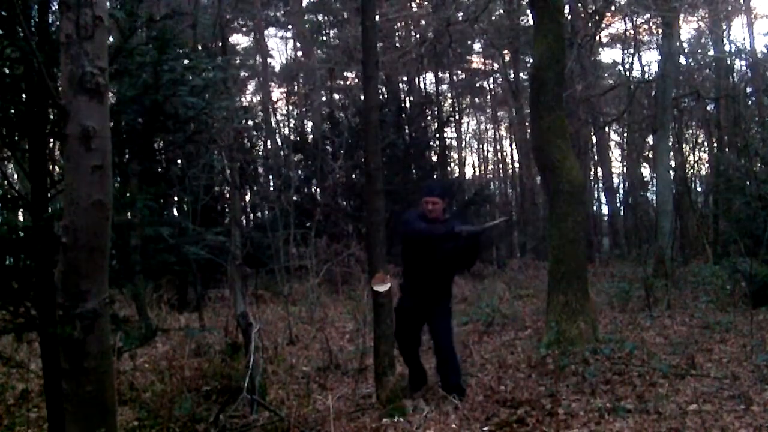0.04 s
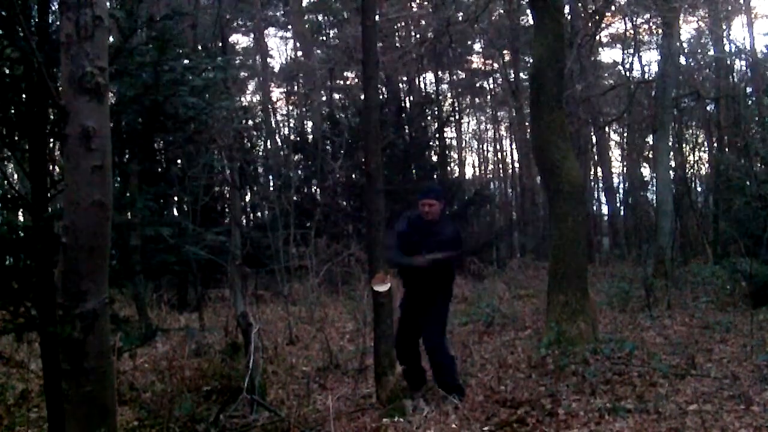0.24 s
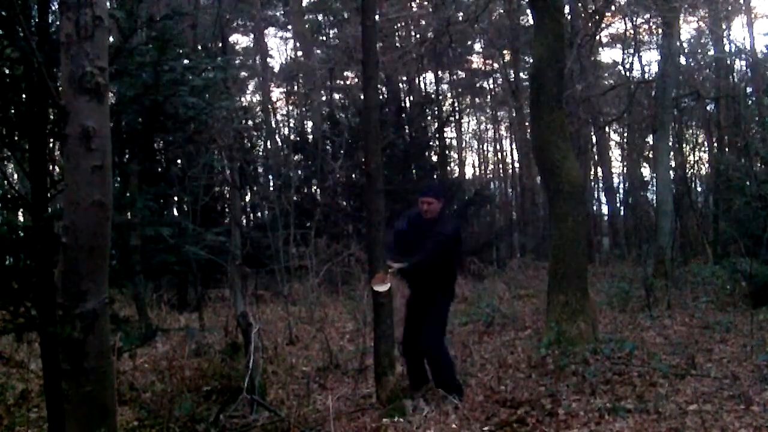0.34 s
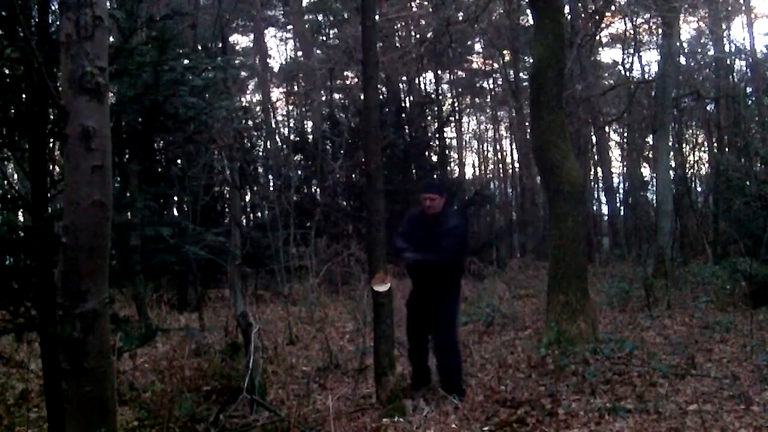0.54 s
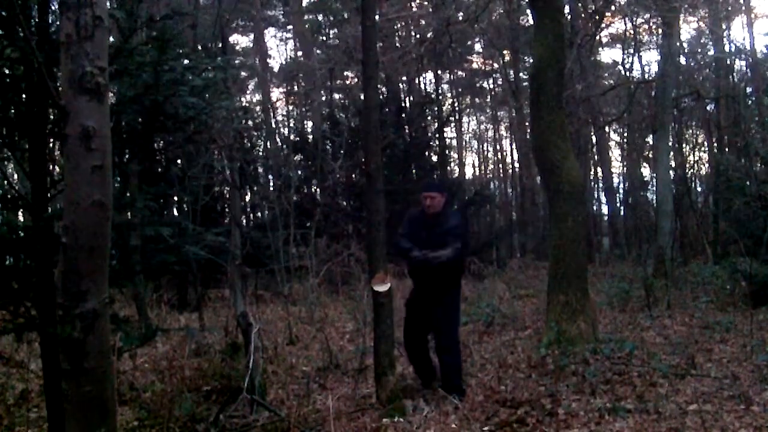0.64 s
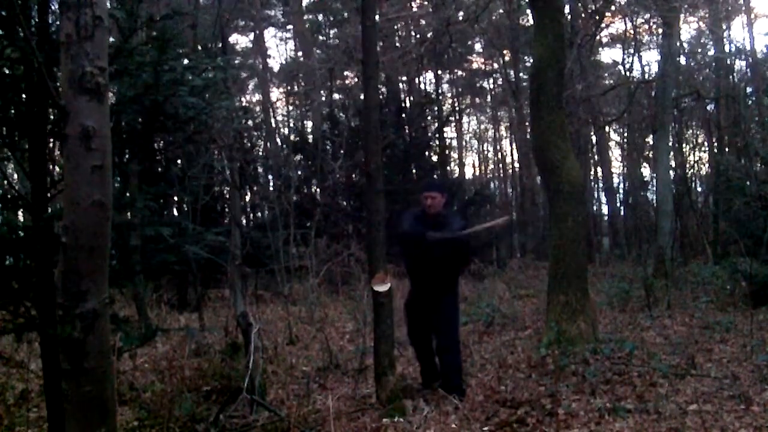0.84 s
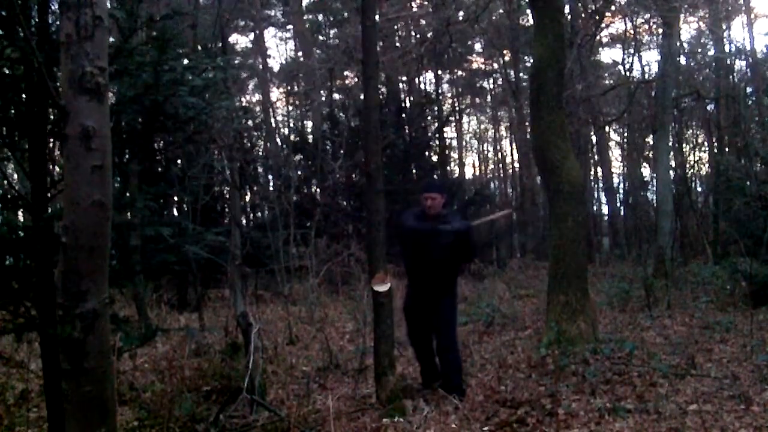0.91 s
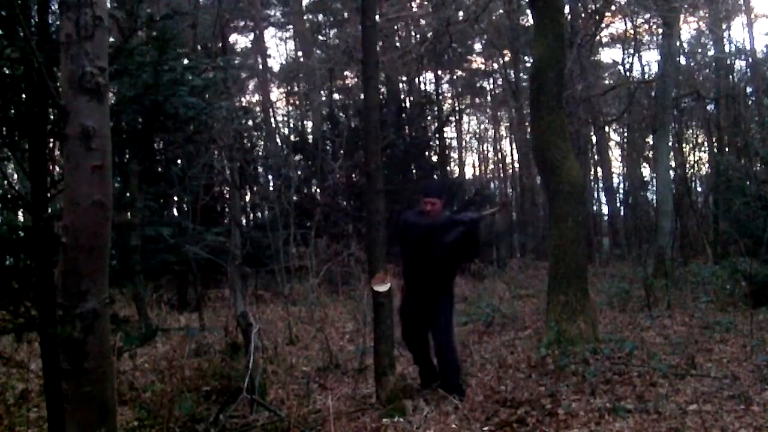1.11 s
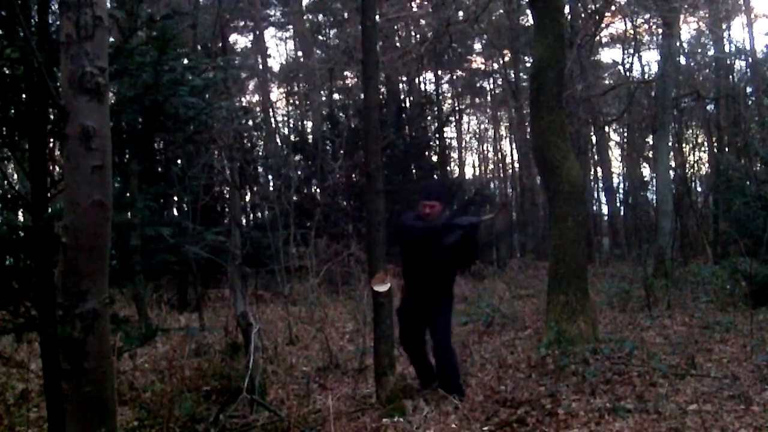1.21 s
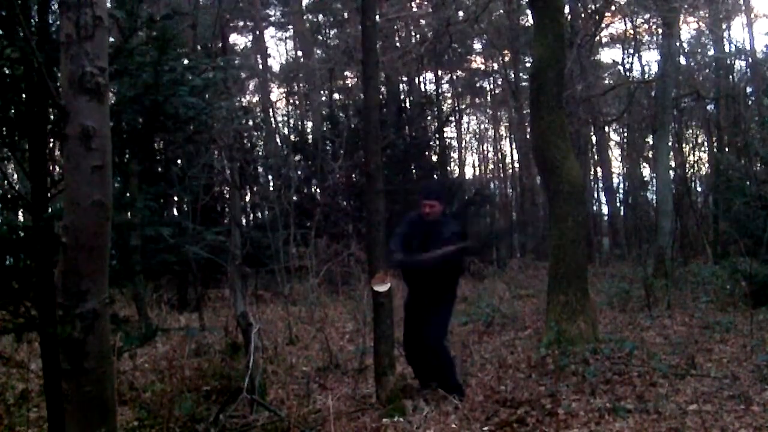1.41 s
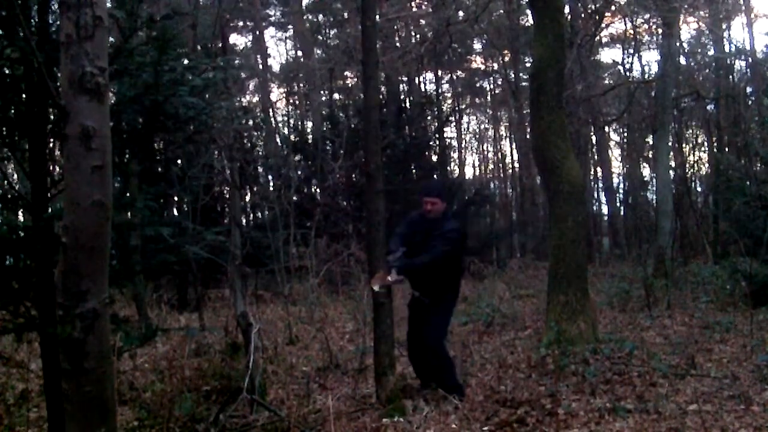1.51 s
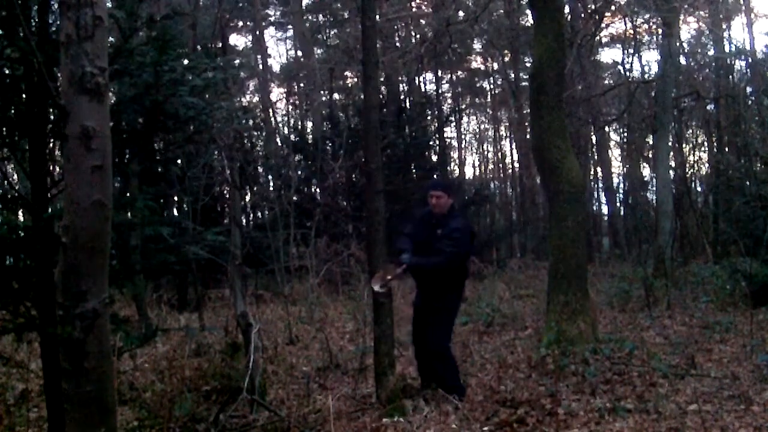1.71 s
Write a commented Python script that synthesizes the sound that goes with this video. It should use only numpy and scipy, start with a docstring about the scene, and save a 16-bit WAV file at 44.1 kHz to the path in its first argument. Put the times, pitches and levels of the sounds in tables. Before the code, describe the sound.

Two sharp axe blows crack into a hollow dead trunk, echoing through a quiet forest

```python
"""Axe on a dead trunk

Two axe blows on a dead standing trunk, some metres away in a quiet forest.
Each blow is a run of impulses that excites decaying modes: crack, knock, hollow ring and stem thud.
Grain noise tears the fibres, and noise decaying band by band is the scatter from the trees.
Around the blows filtered noise makes ticking chips, twigs and dry leaves over a low rumble of air."""
import sys
import numpy as np
from scipy import signal
from scipy.fft import rfft, irfft
from scipy.io import wavfile

SR = 44100
rng = np.random.default_rng(int(sys.argv[2]) if len(sys.argv) > 2 else 0)


def waveform_to_disk(signal):
    """Save audio, clipped to [-1, 1], as 16-bit WAV at the path in sys.argv[1]."""
    frames = np.transpose(np.atleast_2d(signal))
    scaled = np.clip(frames, -1, 1) * 32767
    samples = np.round(scaled).astype(np.int16)
    wavfile.write(sys.argv[1], SR, samples)


N = 77175   # samples
TIME = np.arange(N) / SR   # s

# jolts of the blade in the wood: start_s, crack_db, knock_db, hollow_db, thud_db, knock_upper_edge_hz
JOLTS = [(.2366, -1.5, -26, -22, -24, 1970), (.2430, -26.5, -15.5, -11, -20, 1610),
         (0.2499, -19.5, -32.5, -26.5, -12, 1590), (.2802, -29, -21, -38, -40, 1500),
         (1.4144, -17.5, -52, -23, -51, 1290), (1.4174, -24.5, -39, -56, -33, 1190),
         (1.4224, -17, -19.5, -42, -22.5, 1020), (1.4271, -34, -35, -38, -13, 960),
         (1.4361, -45, -24, -40, -10.5, 1180)]
# colour of dry litter, both snapping and rustling: frequency_hz, level_db
LITTER_COLOUR = [(800, -26.5), (1500, 9.5), (2500, 6), (4000, 2), (7000, -3), (10000, -6.5), (15000, -13)]


def from_db(db):
    """Amplitude ratio: 20 dB is a factor of ten in gain."""
    return 10 ** (np.asarray(db) / 20)


def rms_one(x):
    """Normalisation by mean power: scale to rms 1."""
    return x / np.sqrt(np.mean(x ** 2) + 1e-20)


def at_hz(points, hz, axis=1):
    """Logarithmic pitch scale: read a table's column, interpolated over log frequency."""
    table = np.array(points)
    return np.interp(np.log(hz + 1e-9), np.log(table[:, 0]), table[:, axis])


def coloured(x, spectrum):
    """Linear filtering: weight each frequency of a steady signal; rms 1."""
    bin_hz = np.arange(N // 2 + 1) * SR / N
    gains = from_db(at_hz(spectrum, bin_hz))
    return rms_one(irfft(rfft(x) * gains, N))


def noise(spectrum):
    """Stationary random process: Gaussian noise of a given colour, rms 1."""
    return coloured(rng.standard_normal(N), spectrum)


def grains(per_s, spread_db):
    """Shot noise: random one-sample clicks of uneven size and random sign."""
    excess_db = spread_db * np.minimum(rng.exponential(1, N), 4)
    sizes = from_db(excess_db) * rng.choice([-1, 1], N)
    return sizes * (rng.random(N) < per_s / SR)


def dying(s, t60):
    """Exponential decay: jump to 1 at s, then fall 60 dB in each t60."""
    return (TIME >= s) * np.exp(-np.log(1000) * np.clip((TIME - s) / t60, 0, 10))


def click(s):
    """Unit impulse, shared between the two samples around s."""
    return np.maximum(0, 1 - np.abs(TIME - s) * SR)


def ring(force, modes, alternate=False):
    """Modal superposition: modes of like sign start at once, those of alternating sign swell."""
    out = np.zeros(N)
    for k, (hz, db, t60) in enumerate(modes):
        radius = np.exp(-np.log(1000) / (t60 * SR))   # decay per sample
        angle = 2 * np.pi * hz / SR
        feedback = [1, -2 * radius * np.cos(angle), radius * radius]
        mode = from_db(db) * signal.lfilter([.5, 0, -.5], feedback, force + 1e-18)
        out += -mode if alternate and k % 2 else mode
    return out


def soften(x, hz, order=2):
    """Contact compliance: a soft contact low-passes the force."""
    return signal.sosfilt(signal.butter(order, hz, fs=SR, output="sos"), x + 1e-18)


def air():
    """Broadband ambience: steady noise with most of its power in the bass."""
    # colour of the air: frequency_hz, level_db
    air_colour = [(15, -17.5), (28, -3), (45, -1.5), (65, -4), (95, -13.5), (160, -16), (280, -21),
                  (600, -23), (900, -26), (1450, -26.5), (1750, -39), (3000, -42.5), (5000, -51.5),
                  (8000, -58), (14500, -61), (15800, -55)]
    level_db = -43
    return from_db(level_db) * noise(air_colour)


def leaves():
    """Granular friction: the pressure underfoot sets the level of a dense shower of leaf clicks."""
    # shifts of the leaves, Gaussian in time: centre_s, level_db, standard_deviation_s
    shuffles = [(.205, -66, .012), (0.557, -59, 0.016), (0.611, -59.5, .03), (0.707, -64, 0.051),
                (1.01, -59.5, 0.014), (1.111, -57.5, 0.039), (1.17, -67, 0.023), (1.217, -62.5, 0.027),
                (1.382, -65.5, 0.032), (1.608, -62, 0.031), (1.728, -58, 0.028)]
    pressure = sum(from_db(db) * np.exp(-((TIME - s) / width) ** 2 / 2) for s, db, width in shuffles)
    return pressure * coloured(grains(per_s=3600, spread_db=3.5), LITTER_COLOUR)


def snaps():
    """Resonant fracture: each chip or twig is a dying noise burst, partly filtered by a resonance."""
    # snaps in the litter: start_s, level_db, t60_s, pitch_hz
    snap_events = [(.2858, -34, 0.022, 9300), (0.3506, -37, 0.012, 7900), (.3825, -45.5, 0.018, 7300),
                   (1.084, -37.5, 0.01, 5500), (1.089, -47, 0.095, 2170), (1.145, -39.5, 0.031, 2360),
                   (1.2221, -52, 0.044, 9000), (1.272, -56, .02, 4020), (1.3627, -54.5, 0.036, 6550),
                   (1.537, -46, .012, 6460), (1.676, -48, 0.034, 6000)]
    ring_share = 0.56   # amplitude share of the resonant part
    crunch, out = noise(LITTER_COLOUR), np.zeros(N)
    for s, db, t60, hz in snap_events:
        ringing = rms_one(signal.lfilter(*signal.iirpeak(hz, 2, fs=SR), crunch))
        out += from_db(db) * dying(s, t60) * (ring_share * ringing + (1 - ring_share) * crunch)
    return out


def taps():
    """Damped impact: light wooden taps as coloured noise with exponential decay."""
    # taps between the blows: start_s, level_db, t60_s
    tap_events = [(0.9232, -36.5, 0.1), (1.3091, -32.5, 0.031)]
    # colour of the taps: frequency_hz, level_db
    tap_colour = [(300, -23), (550, 1), (800, 2.5), (1050, 13), (1450, -8), (1800, -16), (3500, -16.5),
                  (7000, -27.5), (15000, -41)]
    return noise(tap_colour) * sum(from_db(db) * dying(s, t60) for s, db, t60 in tap_events)


def forest(near_rise_s, far_rise_s, count=26):
    """Multiple scattering: near stems answer quickly, far ones slowly; each band has its own decay."""
    # scatter of each blow, with a dip in its near colour:
    # start_s, near_db, far_db, dip_hz, dip_depth_db
    echoes = [(0.249, -19, -36.5, 390, 8.5), (1.424, -21.5, -42.5, 1760, 4)]
    # scatter by frequency: frequency_hz, near_db, near_t60_s, far_db, far_t60_s
    scatter = [(50, 2, .7, 26.5, 1.3), (130, 0.5, 0.76, 5, 1.17), (250, 3.5, 0.29, -18, 1.6),
               (420, -2, 0.25, -9, 0.86), (700, -3.5, 0.37, 8, 0.63), (1200, 4.5, 0.14, 6.5, 1.35),
               (1760, -10.5, 0.26, -4, 1.02), (3200, -12.5, 0.36, -4.5, 1.26),
               (5900, -17.5, .22, -10.5, 0.705), (10000, -30.5, 0.37, -29.5, 1.1),
               (15000, -36.5, .2, -27, 0.29)]
    dip_width_octaves = 0.6   # standard deviation of the Gaussian dip
    out, edges = np.zeros(N), np.geomspace(30, 16500, count + 1)
    white = rng.standard_normal((2, N))   # neighbouring bands draw on different noises
    for k, (low, high) in enumerate(zip(edges, edges[1:])):
        centre_hz = np.sqrt(low * high)
        band = signal.sosfilt(signal.butter(2, [low, high], "band", fs=SR, output="sos"), white[k % 2])
        near_db, near_t60, far_db, far_t60 = (at_hz(scatter, centre_hz, axis=c) for c in range(1, 5))
        for s, blow_near_db, blow_far_db, dip_hz, depth_db in echoes:
            octaves = np.log2(centre_hz / dip_hz)
            dip_db = depth_db * np.exp(-(octaves / dip_width_octaves) ** 2 / 2)
            age = np.maximum(TIME - s, 0)
            near_rise, far_rise = 1 - np.exp(-age / near_rise_s), 1 - np.exp(-age / far_rise_s)
            near = from_db(blow_near_db + near_db - dip_db) * dying(s, near_t60) * near_rise
            far = from_db(blow_far_db + far_db) * dying(s, far_t60) * far_rise
            out += band * np.hypot(near, far) * 2   # powers of near and far add
    return out


def trunk(contact_hz, thud_hz):
    """Modal excitation: each jolt sets wood knocking, the cut ringing hollow and the stem thudding."""
    # modes of the stem: frequency_hz, level_db, t60_s
    thud_modes = [(64.2, -13.5, 0.51), (128, -8.5, .11), (152.2, -3, 0.061), (173, -11.5, 0.31),
                  (260.5, -14, 0.26)]
    # modes of the hollow ring: frequency_hz, level_db, t60_s
    hollow_modes = [(590, 2.5, 0.066), (602, 6.5, 0.042), (658.4, -11, .09)]
    # modes of the knocking wood: frequency_hz, level_db, t60_s
    knock_modes = [(793, -5.5, 0.029), (966.4, -14.5, 0.17), (1135, 3, 0.05), (1102, -10, 0.044),
                   (1208, -10, 0.093), (1213, -14, 0.044), (1405, -1.5, .04), (1511, -8.5, 0.12),
                   (1560, -10, 0.082)]
    wood_low_edge_hz = 560   # knock and hollow ring carry little below this
    knocks, hollows, thuds = np.zeros(N), np.zeros(N), np.zeros(N)
    for s, _, knock_db, hollow_db, thud_db, knock_edge_hz in JOLTS:
        knocks += from_db(knock_db) * soften(click(s), knock_edge_hz, order=6)
        hollows += from_db(hollow_db) * click(s)
        thuds += from_db(thud_db) * click(s)
    knocking = ring(knocks, knock_modes)
    hollow = ring(soften(hollows, contact_hz), hollow_modes, alternate=True)
    high_pass = signal.butter(6, wood_low_edge_hz, "high", fs=SR, output="sos")
    wood = signal.sosfilt(high_pass, knocking + hollow)
    return wood + ring(soften(thuds, thud_hz, order=4), thud_modes)


def blade():
    """Brittle fracture: a gritty impulse rings short crack modes, and fibres tear in a dying shower."""
    # modes of the crack: frequency_hz, level_db, t60_s
    crack_modes = [(2530, -5.5, 0.0025), (2685, 1.5, 0.0078), (3428, -10.5, 0.012), (4610, -13.5, 0.0063),
                   (6380, -7, 0.0041), (10900, -17, .002)]
    # colour of the tearing fibres: frequency_hz, level_db
    tear_colour = [(1200, 3.5), (2000, -13.5), (2800, 4), (4000, 0.5), (6200, -14.5), (9000, -16),
                   (15000, -24.5)]
    bite_s, grit_gain = 0.0013, 0.12   # half-height width of the grit's triangle, gain beside the click
    tear_db, tear_t60_s = -8, 0.03   # level relative to the crack, decay
    force, tearing = np.zeros(N), np.zeros(N)
    grit = rng.choice([-1, 1], N)
    for s, crack_db, *_ in JOLTS:
        entry = np.maximum(0, 1 - np.abs(TIME - s - bite_s / 2) / bite_s)
        force += from_db(crack_db) * (click(s) + grit_gain * entry * grit)
        tearing += from_db(crack_db + tear_db) * dying(s, tear_t60_s)
    fibres = tearing * coloured(grains(per_s=7700, spread_db=6.5), tear_colour)
    return ring(force, crack_modes, alternate=True) + fibres


def scene():
    """Superposition: air, forest floor, scatter and blows add as pressures in one channel."""
    floor = leaves() + snaps() + taps()
    scattered = forest(near_rise_s=0.0044, far_rise_s=.03)
    blows = trunk(contact_hz=1220, thud_hz=250) + blade()
    return (air() + floor + scattered + blows)[None]


def record(dry):
    """Saturation and band limits: rounded peaks, a microphone notch, electronic whine, a treble cut."""
    # faint steady whines: frequency_hz, rms_level_db
    whines = [(7865, -87.5), (15735, -90)]
    peak_limit = 0.73   # of full scale, ahead of the filters
    notch_hz, notch_q = 7950, 9.7
    cutoff_hz = 16300
    rounded = peak_limit * np.tanh(dry / peak_limit)
    dipped = signal.lfilter(*signal.iirnotch(notch_hz, notch_q, fs=SR), rounded)
    whine = sum(from_db(db) * np.sqrt(2) * np.sin(2 * np.pi * hz * TIME) for hz, db in whines)
    low_pass = signal.ellip(10, .1, 80, cutoff_hz, fs=SR, output="sos")
    return signal.sosfilt(low_pass, dipped + whine)


dry = scene()
out = record(dry)
waveform_to_disk(out)
```